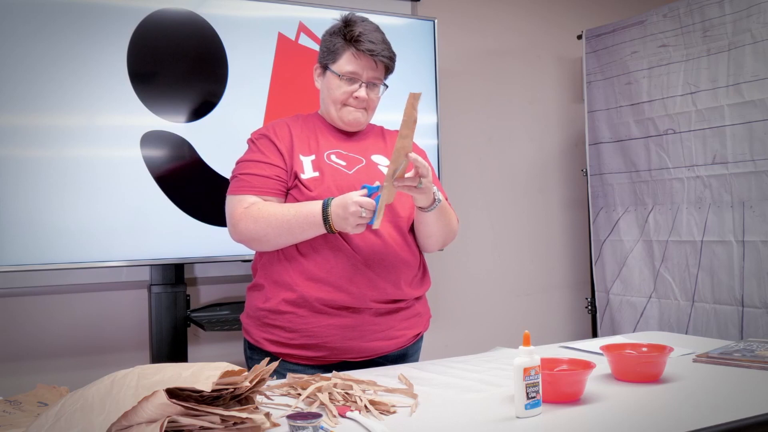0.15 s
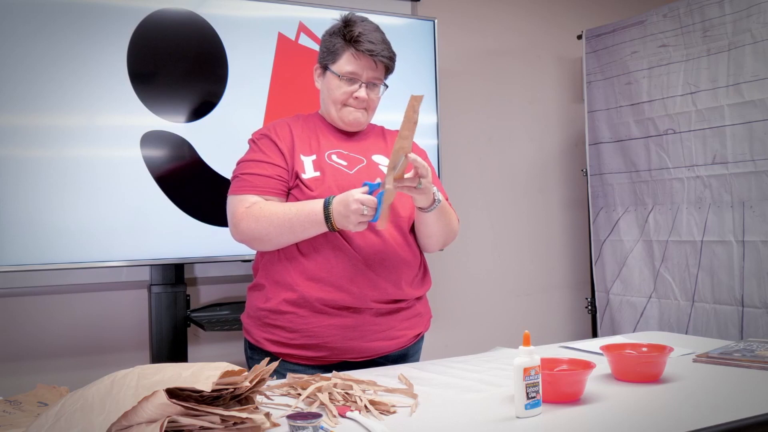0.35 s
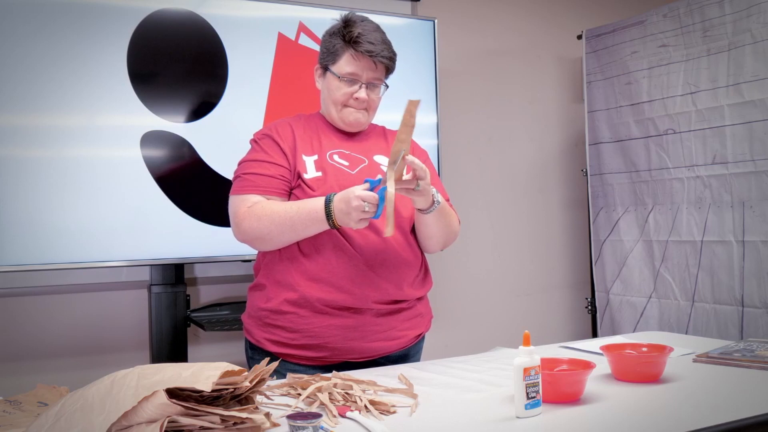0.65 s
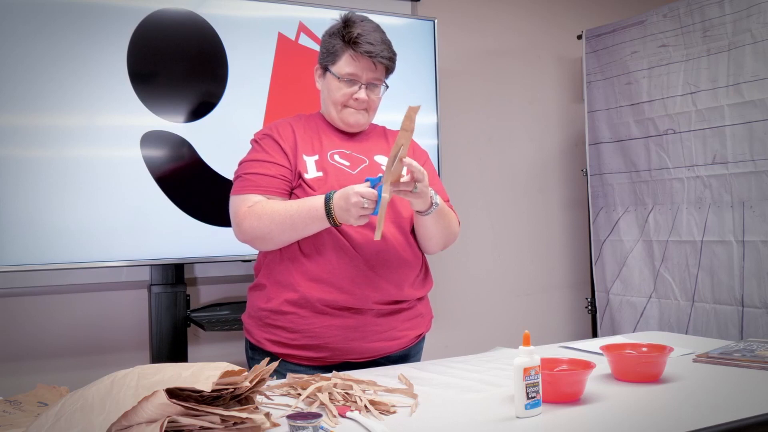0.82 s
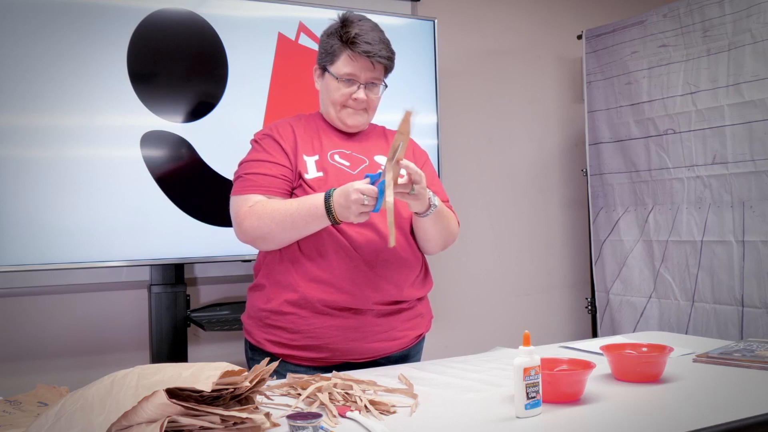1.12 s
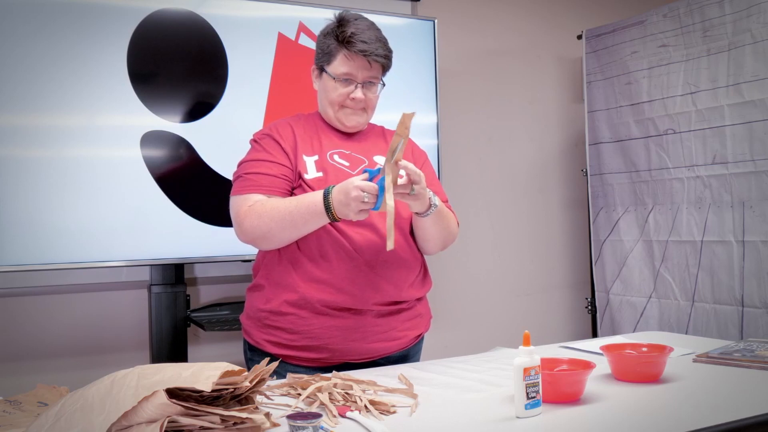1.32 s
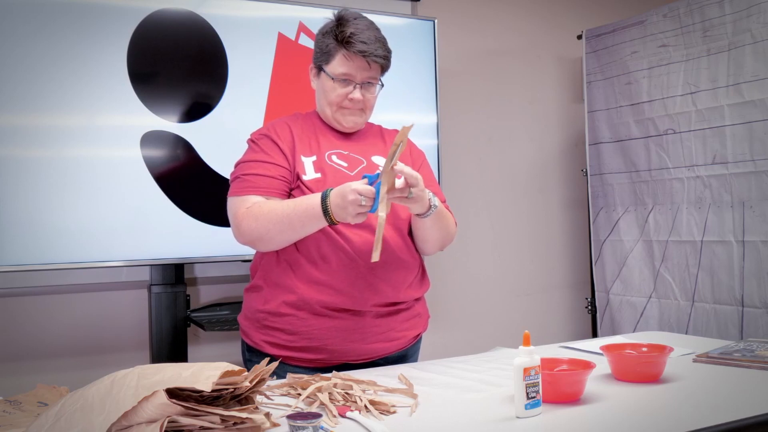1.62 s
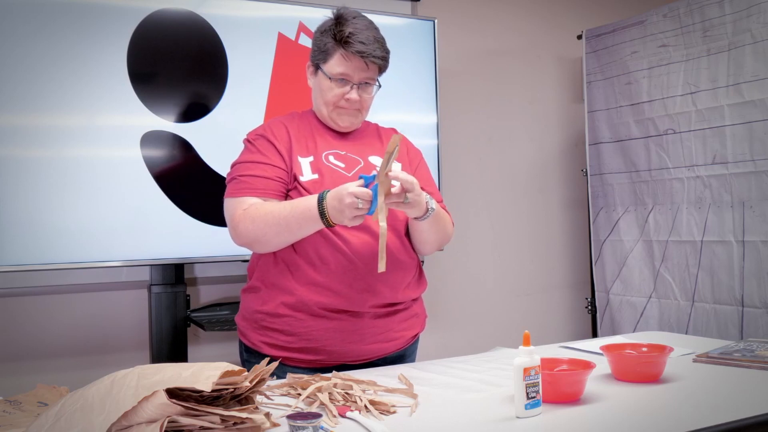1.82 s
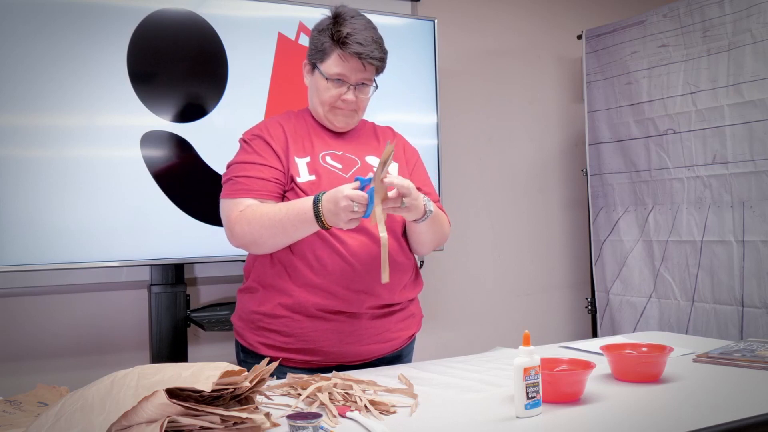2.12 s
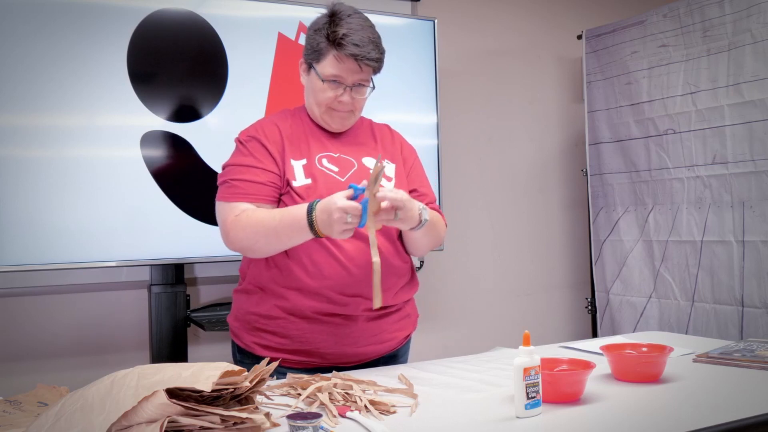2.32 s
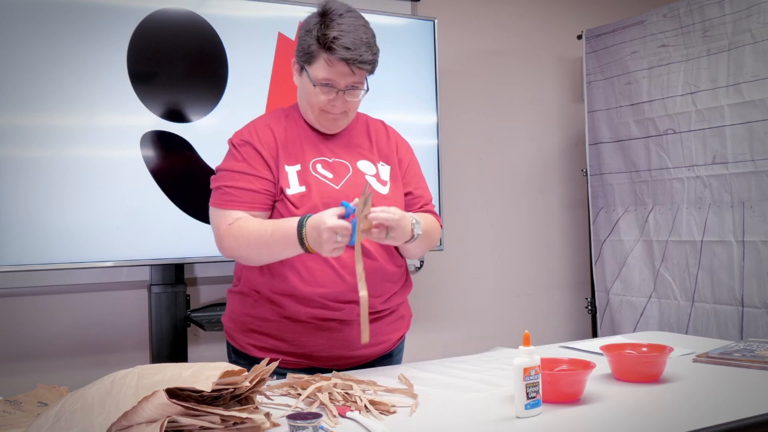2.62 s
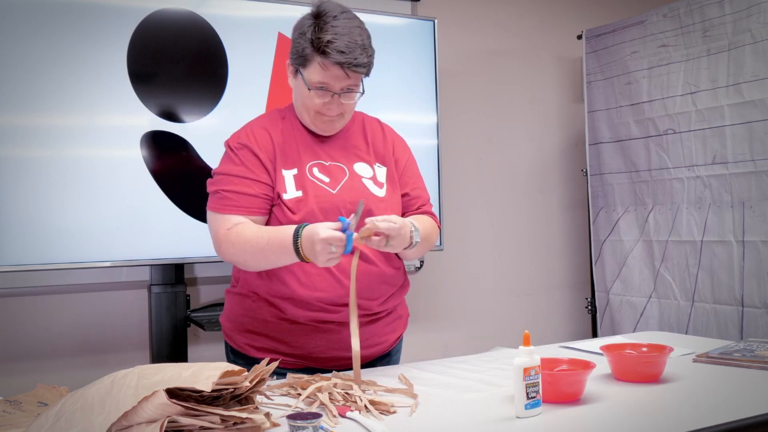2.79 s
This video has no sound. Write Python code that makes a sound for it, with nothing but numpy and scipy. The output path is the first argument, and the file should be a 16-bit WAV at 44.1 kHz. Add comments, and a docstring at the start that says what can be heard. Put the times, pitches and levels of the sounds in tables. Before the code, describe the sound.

Scissors cutting stiff paper, close and mono in a small room. Silence until 0.2 s, then light snips with a sharp blade tick near 0.28 and a rougher crunch at 0.55. Long, strong cuts come at 0.8 and 1.15, quick ones from 1.5 to 1.75, then more at 1.9, 2.2, 2.3, 2.45 and 2.7. Fine rustle and faint hum sink between strokes; quiet after 2.85.

```python
"""Scissors cut stiff brown paper in quick strokes close to a mono microphone in a small room.
The cut is a dense swarm of random clicks, the snapping fibres, coloured by the sheet as it is held.
Blade ticks are filtered clicks with a faint ring and fizz; the rustle of the paper is finer crackle.
An appliance hums as a few sines over low air noise.
A noise gate opens for each stroke and sinks between them."""
import sys
import numpy as np
from scipy import signal
from scipy.io import wavfile
from scipy.ndimage import uniform_filter1d

SR = 44100
rng = np.random.default_rng(int(sys.argv[2]) if len(sys.argv) > 2 else 0)


def bounce(signal):
    """Save signal as a 16-bit WAV file at the path given by the first command-line argument."""
    frames = np.transpose(np.atleast_2d(signal))
    limited = np.clip(frames, -1, 1)
    pcm = np.round(limited * 32767).astype(np.int16)
    wavfile.write(sys.argv[1], SR, pcm)


N = 130095  # length in samples


def amp(db):
    """Turn decibels into a plain multiplier."""
    return 10 ** (np.asarray(db) / 20)


def evened(x):
    """Scale a sound to an average (rms) level of 1."""
    return x / np.sqrt(np.mean(x ** 2) + 1e-20)


def colour(x, points):
    """Filter through (pitch_hz, level_db) points, with no sound ahead of its cause (minimum phase)."""
    pitch_hz, level_db = np.transpose(points)
    hz = abs(np.fft.fftfreq(4096, 1 / SR))
    # natural-log gain, as the Hilbert step that finds the phase needs it
    log_gain = np.interp(np.log(hz + 1), np.log(pitch_hz), level_db) * np.log(10) / 20
    spectrum = np.exp(np.conj(signal.hilbert(log_gain)))
    taps = np.fft.ifft(spectrum).real[:2048]
    return signal.oaconvolve(x, taps)[:len(x)]


def snaps(per_s, spread_db, clump_db):
    """Clicks of random sign and size at random moments, louder and softer in clumps."""
    size = amp(spread_db * np.minimum(rng.exponential(1, N), 5))
    size = size * rng.choice([-1., 1.], N)
    wander = uniform_filter1d(rng.standard_normal(N), size=300)
    clumps = evened(uniform_filter1d(wander, size=300))
    clicks = size * (rng.random(N) < per_s / SR)
    return evened(clicks) * amp(clump_db * clumps)


# hum lines of the appliance, before the gate: pitch_hz, level_db (rms)
HUM_LINES = [(59, -63.5), (111.8, -52), (224, -59), (335, -66)]
# colour of the air noise: pitch_hz, level_db
AIR_COLOUR = [(4, -49), (20, 1.5), (40, -7), (70, -6.5), (160, -5.5), (300, -10.5), (1000, -10),
              (4000, -23), (16000, -46)]
AIR_DB = -52  # rms level before the gate


def background():
    """An appliance's steady hum lines, each a sine, over low air noise."""
    t = np.arange(N) / SR
    hum = np.zeros(N)
    for pitch_hz, level_db in HUM_LINES:
        sine = np.sin(2 * np.pi * (pitch_hz * t + rng.random()))
        hum += amp(level_db) * np.sqrt(2) * sine  # a sine peaks at sqrt(2) times its rms
    air = evened(colour(rng.standard_normal(N), AIR_COLOUR))
    return hum + amp(AIR_DB) * air


# how long the room rings on at each pitch: pitch_hz, time to fall 60 dB_s
ROOM_DECAY = [(200, 0.34), (1000, 0.37), (4000, 0.16), (12000, 0.21)]
ROOM_DB = -8.5  # level of the echo filter, whose energy is evened to 1


def room(x):
    """Echoes of the room: sparse taps of random sign, each pitch dying at its own speed."""
    taps = np.zeros(SR // 2)
    at = np.arange(200, SR // 2 - 20, 20)
    at = at + rng.integers(0, 20, len(at))
    taps[at] = rng.choice([-1., 1.], len(at))
    hz, t, bands = signal.stft(taps, SR, nperseg=256)
    pitch_hz, t60_s = np.transpose(ROOM_DECAY)
    decay_db = -60 * t / np.interp(hz, pitch_hz, t60_s)[:, None]
    tail = signal.istft(bands * amp(decay_db), SR, nperseg=256)[1]
    return signal.fftconvolve(x, tail / np.linalg.norm(tail))[:N]


# loudness of the rustle over time: time_s, level_db
RUSTLE_LEVEL = [(0.188, -46), (0.218, -46.5), (.4, -43), (.5, -49), (.72, -45), (.77, -43), (1.05, -44.5),
                (1.11, -46), (1.38, -48), (1.45, -48), (1.475, -43.5), (1.5, -51.5), (1.82, -47),
                (1.86, -45), (2.1, -45.5), (2.16, -46), (2.38, -43.5), (2.67, -44), (2.82, -44.5),
                (2.833, -56.5), (2.847, -44.5), (2.87, -52), (2.95, -57.5)]
# colour of the rustle: pitch_hz, level_db
RUSTLE_COLOUR = [(180, -24.5), (300, -5.5), (915, -5.5), (1560, -6), (1690, -4.5), (1900, -4), (3830, -2),
                 (9710, -15.5), (16000, -21.5)]


def rustle():
    """Fine crackle of the paper between the fingers: coloured clicks that follow a level over time."""
    time_s, level_db = np.transpose(RUSTLE_LEVEL)
    crackle = colour(snaps(per_s=9000, spread_db=2.16, clump_db=0.53), RUSTLE_COLOUR)
    return evened(crackle) * amp(np.interp(np.arange(N) / SR, time_s, level_db))


# pitches at which the scissors ring: pitch_hz, level_db, time to fall 60 dB_s
SCISSOR_MODES = [(949, -7.5, 0.2), (1062.4, -8.5, 0.19), (1433, -8, 0.052), (1498, -1.5, 0.12),
                 (1662, -6, 0.14), (3086, -4, 0.17), (3580, -6, 0.047), (3793, 11.5, 0.011),
                 (4193, 3.5, 0.035), (5456, -2, 0.05)]


def scissor_ring():
    """The metal rings as a sum of dying sines, one for each way the scissors can shake."""
    t = np.arange(4096) / SR
    total = np.zeros(4096)
    for pitch_hz, level_db, t60_s in SCISSOR_MODES:
        total += amp(level_db - 60 * t / t60_s) * np.sin(2 * np.pi * pitch_hz * t)
    return total


# blade ticks: start_s, level_db (peak of the click), fizz_db (over that peak, before halving)
BLADE_TICKS = [(.2823, -13, -22), (.2832, -20, -14), (.3250, -29, -3), (.4370, -29, -4), (.4990, -38, 6),
               (.5140, -24, -1), (.6190, -24, -2), (1.0955, -36, 3), (1.1990, -15, -12),
               (1.2829, -20.5, -12), (1.4760, -33, -4), (1.4928, -25, -8), (1.4985, -29, -25),
               (1.5455, -26, -30), (1.5815, -38, 3), (1.5865, -37, 5), (1.8895, -21, -18), (2.0150, -36, 3),
               (2.2900, -29, -3), (2.8370, -36, 2), (2.8440, -30, -4)]
# colour of the click and its ring: pitch_hz, level_db
TICK_COLOUR = [(500, -25), (2200, -14), (4500, 0), (7000, -5), (11000, -15), (16000, -34)]
# colour of the fizz: pitch_hz, level_db
FIZZ_COLOUR = [(3000, -30), (7000, -4), (10500, 0), (16000, -4)]
TICK_RING_DB, FIZZ_S = -38, .001  # ring before colouring; fizz falls to about a third in FIZZ_S


def ticks():
    """A sharp click of the blades with a faint ring of the scissors and a tiny bright fizz."""
    hits, fizz = np.zeros(N), np.zeros(N)
    t = np.arange(4096) / SR
    for start_s, level_db, fizz_db in BLADE_TICKS:
        at = round(start_s * SR)
        hits[at] = amp(level_db)
        fizz[at] = amp(level_db + fizz_db)
    click = t == 0  # a single sample
    tick = colour(click + amp(TICK_RING_DB) * scissor_ring(), TICK_COLOUR)
    puff_level = signal.oaconvolve(fizz, np.exp(-t / FIZZ_S))[:N]
    hiss = evened(colour(rng.standard_normal(N), FIZZ_COLOUR))
    return signal.oaconvolve(hits, tick / abs(tick).max())[:N] + puff_level * hiss / 2


TEAR_RISE_S, TEAR_FALL_S = 0.0026, 0.0027


def tear(since_s, strength_db):
    """Boost in dB of one short tear: a quick rise times a fall that already starts with it."""
    rise = np.clip(since_s / TEAR_RISE_S, 0, 1)
    fall = np.exp(-np.maximum(since_s, 0) / TEAR_FALL_S)
    return strength_db * rise * fall


PATCH_DB = 2  # typical size of the bright and dull patches


def bent(x):
    """The sheet bends as it is cut: bright and dull patches wander over time and pitch."""
    bands = signal.stft(x, nperseg=512, noverlap=384)[2]
    patches = rng.standard_normal(bands.shape[::-1]).T
    patches = uniform_filter1d(patches, size=3, axis=0)  # smooth over pitch
    patches = uniform_filter1d(patches, size=12, axis=1)  # smooth over time
    changed = bands * amp(PATCH_DB * evened(patches))
    return signal.istft(changed, nperseg=512, noverlap=384)[1][:N]


# one table per stroke, level over time: time_s, cut_db (middle pitches),
# flap_db (low flap of the sheet, over the cut), sizzle_db (treble, over the cut)
STROKE_LEVELS = [
    [(0.195, -55.5, -8, 1), (0.211, -43.5, -25, -7), (0.227, -37.5, -23, -15), (0.235, -38.5, -4.5, -8),
     (0.265, -37, -7.5, 0), (0.287, -33, -15.5, -11.5), (0.305, -40, -4.5, -2), (0.327, -43.5, -6.5, -23),
     (0.35, -60, 5, -31)],
    [(0.43, -42, -7, -18), (0.442, -41.5, -7.5, -28), (0.464, -40, -18, -9), (0.484, -47.5, 3, -19),
     (0.495, -68, -3, -13)],
    [(0.51, -49, -6, -1), (0.52, -38.5, -6, -3.5), (0.552, -30, -19, -9), (0.566, -31.5, -12, -8),
     (0.65, -42, -4.5, -11), (0.69, -50, -3, -2)],
    [(0.78, -52.5, -13, 7.5), (0.808, -34, -6.5, -15.5), (0.83, -27, -18.5, -6), (0.858, -26.5, -8.5, -8),
     (0.895, -31.5, -6.5, -6.5), (0.93, -39, -5.5, -10), (0.99, -49.5, 1, -37)],
    [(1.135, -53.5, -1, 25.5), (1.149, -28.5, -12, -11.5), (1.167, -28.5, -19, -4.5),
     (1.209, -27, -12, -11), (1.267, -41, -12, -18), (1.287, -35.5, -11.5, -12), (1.33, -49.5, -4, -40)],
    [(1.465, -54, -32, -21), (1.499, -38.5, -11.5, -9), (1.54, -45.5, -7, -29)],
    [(1.54, -59, -13, -23), (1.548, -41, -12, -34.5), (1.574, -50.5, 12, -28), (1.584, -37, -8.5, -8),
     (1.595, -39, -22, 1)],
    [(1.583, -42, 8, -16), (1.599, -31, -19, -10), (1.627, -26.5, -17, -9.5), (1.735, -45, -5.5, -28),
     (1.78, -45, -10.5, -10)],
    [(1.865, -51, -11, -10), (1.889, -34.5, -6.5, -7), (1.919, -30.5, -13.5, -8.5), (1.973, -36, -10, -14),
     (2.021, -54, 5, -21), (2.05, -48.5, -2.5, -5.5)],
    [(2.17, -49, -7, -15), (2.194, -37.5, -17, -8), (2.206, -32.5, -9.5, -5.5), (2.28, -42.5, -9.5, -20),
     (2.285, -61, -17, -15)],
    [(2.275, -53, 5, -14), (2.299, -34.5, -5, -12.5), (2.36, -56, -7, 2)],
    [(2.4, -53.5, -10, 6), (2.424, -35, -6.5, -9), (2.438, -32.5, -16, -1.5), (2.462, -27.5, -18, -8),
     (2.506, -34, -12.5, -11.5), (2.54, -36, -3.5, -12.5), (2.578, -35.5, -10, -9), (2.624, -48.5, -6, -33),
     (2.64, -66.5, 16, -32)],
    [(2.69, -51, -32, -5), (2.716, -36, -21, -4), (2.732, -29, -17.5, -8.5), (2.8, -58, -1, -47)],
]
# one table per stroke, colour of the sheet as it is held: pitch_hz, level_db
SHEET_COLOURS = [
    [(120, -41), (200, -24.5), (288, -5), (585, -18.5), (906, -9.5), (1170, -7.5), (1380, -5),
     (2020, -17.5), (3550, -2), (15500, -20)],
    [(120, -62.5), (200, -6), (742, -12.5), (1260, -5), (1980, -11), (3680, -7), (15500, -9)],
    [(120, -60.5), (200, -1.5), (288, 1.5), (515, -6.5), (618, -6.5), (1210, -5.5), (1480, 1),
     (2290, -10.5), (3420, 2), (15500, -20.5)],
    [(120, -41), (200, -21), (250, -7.5), (630, -7), (702, -14.5), (1450, 0.5), (2060, -5), (3070, -2),
     (7800, 5), (10200, 12.5), (12800, 5), (15500, 1.5)],
    [(120, -45), (200, -11.5), (534, -11.5), (906, -7.5), (1450, -10.5), (1650, -1), (2060, -10),
     (3120, -8), (9830, -7.5), (15500, -15)],
    [(120, -26), (200, -7), (1050, -14.5), (1190, -1), (2650, -7.5), (3300, -1.5), (15500, -23.5)],
    [(120, -54), (200, -19), (352, -15), (1050, 3.5), (2290, -19), (2960, -18.5), (6130, -17), (15500, -37)],
    [(120, -33), (200, -12.5), (392, -3.5), (702, -8), (923, -4.5), (1980, -2), (3010, 0), (3240, -0.5),
     (3680, -2.5), (8000, -1.5), (11200, 3), (15500, -3)],
    [(120, -34), (200, -21), (497, -9), (827, -15), (1050, -5), (1840, 1), (2750, -1.5), (3480, 1),
     (3960, -0.5), (15500, -3)],
    [(120, -30), (200, -5.5), (923, -11), (1090, 1), (1230, -12.5), (1650, -0.5), (3360, -5), (15500, 10.5)],
    [(120, -28), (200, -17), (454, 6.5), (564, -5.5), (1680, -9), (2170, -2), (2960, -8.5), (15500, -32)],
    [(120, -41), (200, -12), (365, 8), (520, 1), (715, 5.5), (827, -3.5), (1050, -2.5), (1380, -5.5),
     (2850, -3.5), (13900, -17.5), (15500, -21)],
    [(120, -78.5), (200, 3), (715, -2), (906, -10.5), (1400, 3), (1680, -6), (3120, -3), (15500, -16)],
]
# treble colour shared by all strokes: pitch_hz, level_db
SHARED_TREBLE_COLOUR = [(3500, 2.5), (5500, 2), (6500, -3), (8000, -6), (10200, -3), (12000, -4),
                        (14000, -7), (16000, -5.5)]
# how much each stroke rings the scissors, on top of RING_DB: level_db
STROKE_RINGS = [-6.5, -8, -6, 3, -2, -9.5, -9, -4.5, -4, -1, -11, -37, -14.5]
# short tears, where many fibres give way at once: start_s, strength_db (before rise and fall)
SHORT_TEARS = [(.29, 2), (0.545, 6.5), (.587, 17), (0.628, 15), (0.817, 6.5), (0.839, 3), (0.887, 8),
               (0.928, 5), (2.295, 2), (2.496, 3.5), (2.554, 3)]
SNAPS_PER_S, SNAP_SPREAD_DB, CLUMP_DB = 8000, 2.0, 0.9
FLAP_HZ, SIZZLE_HZ = 1010, 7100  # flap lies below, sizzle above
RING_DB, START_S, STOP_DB_PER_S = -41, 0.0083, 400


def cutting():
    """Snapping fibres shake the scissors a little and sound through the sheet, stroke by stroke."""
    fibres = snaps(SNAPS_PER_S, SNAP_SPREAD_DB, CLUMP_DB)
    t, out = np.arange(N) / SR, np.zeros(N)
    fibres = fibres * amp(sum(tear(t - start_s, db) for start_s, db in SHORT_TEARS))
    rung = amp(RING_DB) * signal.oaconvolve(fibres, scissor_ring())[:N]
    below_flap = signal.butter(3, FLAP_HZ, fs=SR, output="sos")
    below_sizzle = signal.butter(3, SIZZLE_HZ, fs=SR, output="sos")
    for rows, sheet, ring_db in zip(STROKE_LEVELS, SHEET_COLOURS, STROKE_RINGS):
        time_s, cut_db, flap_db, sizzle_db = np.transpose(rows)
        first_s, last_s = time_s[0], time_s[-1]
        on = slice(round(first_s * SR), round((last_s + .15) * SR))
        now = t[on]
        shaken = fibres[on] + amp(ring_db) * rung[on]
        x = colour(colour(shaken, sheet), SHARED_TREBLE_COLOUR)

        # split into low flap, middle and sizzle, and set the level of each
        flap = signal.sosfiltfilt(below_flap, x)
        under = signal.sosfiltfilt(below_sizzle, x)
        mix = evened(under - flap)
        mix = mix + amp(np.interp(now, time_s, flap_db)) * evened(flap)
        mix = mix + amp(np.interp(now, time_s, sizzle_db)) * evened(x - under)

        mix = mix * np.clip((now - first_s) / START_S, 0, 1)
        stop_db = STOP_DB_PER_S * np.maximum(now - last_s, 0)
        out[on] += mix * amp(np.interp(now, time_s, cut_db) - stop_db)
    return bent(out)


def scene():
    """Cut, ticks and rustle with their room echo, over the background; the same on both channels."""
    hands = cutting() + ticks() + rustle()
    mid = hands + amp(ROOM_DB) * room(hands) + background()
    return np.array([mid, mid])


# opening fade: start_s, end_s
FADE_TIMES = (.19, .205)
GATE_DB, GATE_DEPTH_DB = -39, -65  # level where the gate opens; its lowest gain
GATE_SLOPE, GATE_OPEN_SLOPE = 2.73, 0.033  # gain per level (dB per dB), below and above GATE_DB
GATE_FALL_DB_PER_S, GATE_SENSE_S = 221, 0.014
EDGE_HZ = 15700  # top of the sound


def record(dry):
    """A gate opens quickly and closes at a steady rate; a short fade-in, then the treble limit."""
    above_hum = signal.butter(2, 400, "high", fs=SR, output="sos")
    heard = signal.sosfilt(above_hum, dry.mean(0))
    power = abs(uniform_filter1d(heard ** 2, round(GATE_SENSE_S * SR), origin=100))
    over_db = 10 * np.log10(power + 1e-12) - GATE_DB
    # once open, the gate still leans a little with the level
    want_db = np.clip(GATE_SLOPE * over_db, GATE_DEPTH_DB, GATE_OPEN_SLOPE * over_db)

    # the running maximum on a rising ramp limits how fast the gain can fall
    fall = np.arange(N) * GATE_FALL_DB_PER_S / SR
    gate_db = np.maximum.accumulate(want_db + fall) - fall
    gate_db = uniform_filter1d(gate_db, size=160)

    fade = np.interp(np.arange(N) / SR, FADE_TIMES, [0, 1])
    treble_limit = signal.firwin(511, EDGE_HZ, window=("kaiser", 9), fs=SR)
    return signal.oaconvolve(dry * amp(gate_db) * fade, treble_limit[None], "same")


dry = scene()
out = record(dry)
bounce(out)
```